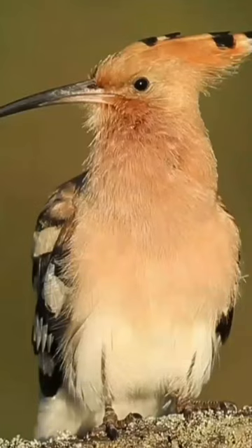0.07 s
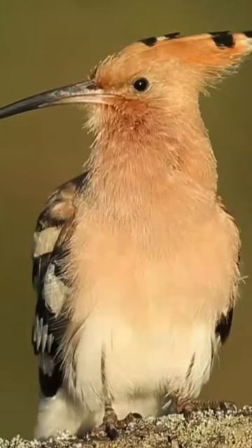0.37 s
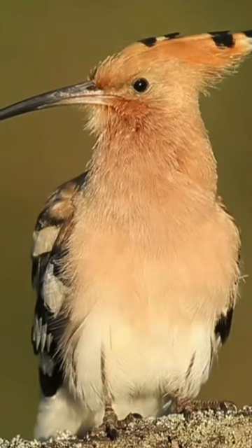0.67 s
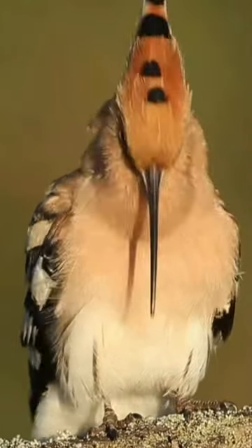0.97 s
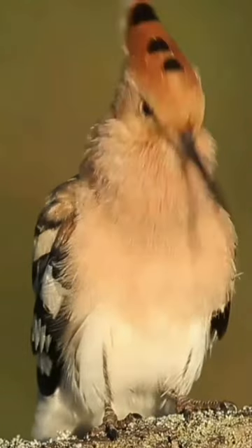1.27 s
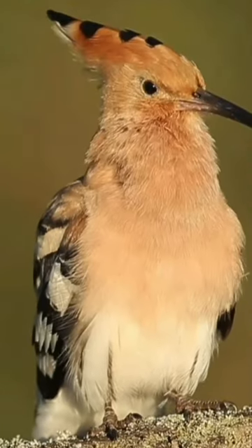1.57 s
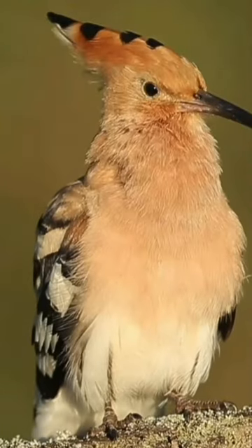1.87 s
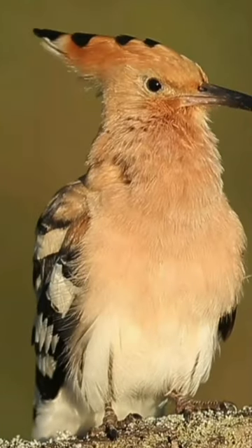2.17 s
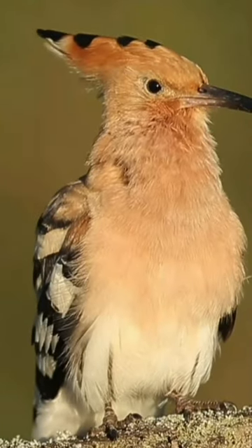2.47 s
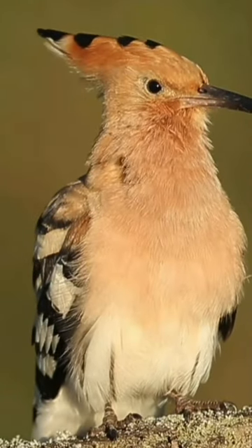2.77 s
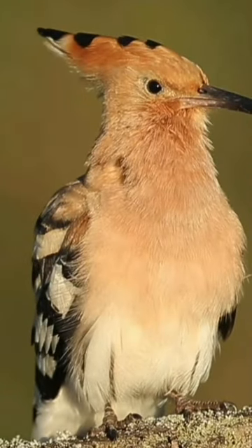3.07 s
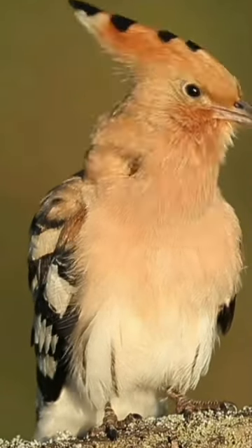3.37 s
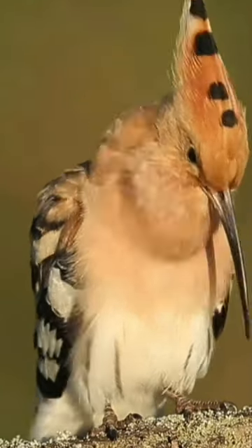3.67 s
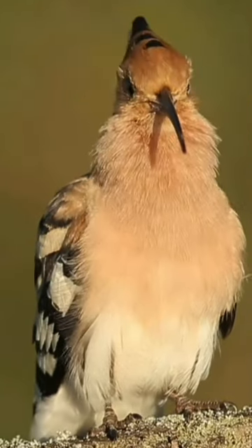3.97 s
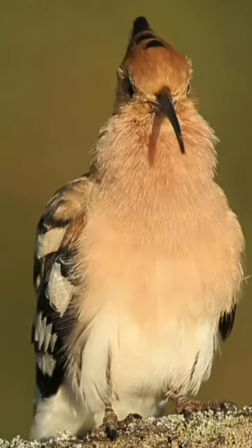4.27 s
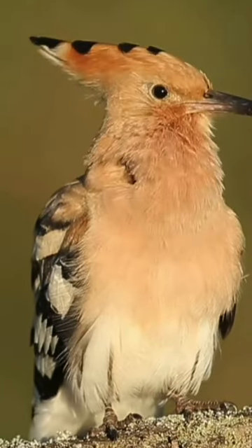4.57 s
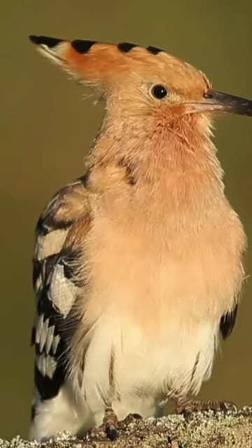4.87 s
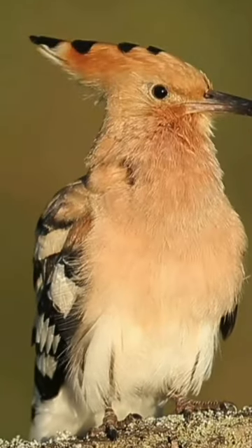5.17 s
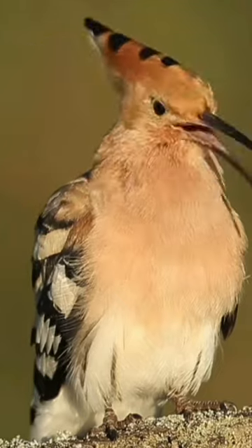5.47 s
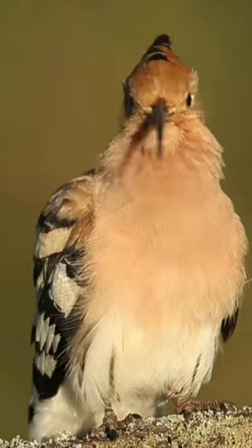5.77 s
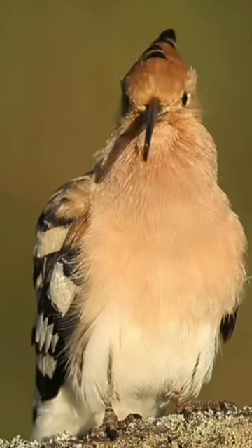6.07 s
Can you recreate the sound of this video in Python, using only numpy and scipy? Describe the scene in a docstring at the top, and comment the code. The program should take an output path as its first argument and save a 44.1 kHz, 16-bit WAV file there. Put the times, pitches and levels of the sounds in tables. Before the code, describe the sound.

Soft double hoots from a nearby bird sound twice, with distant twittering, falling whistles and an even hiss behind them.

```python
"""A hoopoe on a branch gives two pairs of soft, almost pure hoots from its swollen throat, and the
trees around send them back faintly. Farther off, one bird repeats a thin descent and a long falling
whistle; others twitter, chirp, tick, warble and trill, all gliding tones blurred by trunks and leaves.
A few soft plops and one dry, ringing knock fall between the calls. One microphone takes it all in,
over a steady outdoor hiss with two thin whines and, later, two faint far drones."""
import sys
import numpy as np
from scipy import signal
from scipy.fft import rfft, irfft
from scipy.io import wavfile
from scipy.ndimage import uniform_filter1d

SR = 44100
rng = np.random.default_rng(int(sys.argv[2]) if len(sys.argv) > 2 else 0)


def wav_out(sig):
    """Save sig, one row per channel (or a flat mono array), as 16-bit PCM at SR to the path in sys.argv[1]."""
    wavfile.write(sys.argv[1], SR, np.round(np.clip(np.atleast_2d(sig).T, -1, 1) * 32767).astype(np.int16))


N = 273861
TIME = np.arange(N) / SR

# Colour of the air and microphone hiss. Each row: frequency in Hz, relative density in dB.
HISS_SPECTRUM = [(25, -30), (55, -2.5), (95, 1.5), (160, -2), (300, -2), (600, 1), (1200, -2.5), (2000, -7),
                 (4000, -6.5), (7000, -10.5), (8000, -10.5), (10000, -13.5), (13000, -15), (15500, -17.5)]
# Thin, steady whines. Each row: pitch in Hz, level in dB.
WHINES = [(7838, -79.5), (14040, -88)]
# Faint drones, far off. Each row: start and end in seconds, pitch in Hz, level in dB.
DRONES = [(3.899, 5.39, 420.6, -71.5), (4.15, 6.593, 584.7, -72)]
# Twittering deep in the trees. Each row: start and end in seconds, relative level in dB,
# centre pitch in Hz.
TWITTER_BOUTS = [(0.201, .27, -66, 3700), (0.568, .72, -68, 2910), (1.117, 1.62, -68.5, 4980),
                 (1.647, 2.45, -68.5, 3480), (2.502, 2.7, -66.5, 4400), (2.601, 3.4, -67.5, 2955),
                 (3.919, 4.12, -60, 3890), (4.004, 4.139, -66, 6460), (4.152, 4.85, -63.5, 3890),
                 (4.868, 4.97, -64, 5740), (5.041, 5.24, -61, 2800), (5.384, 5.6, -60, 4590)]
# The whistler's songs. Each row: start and length of the whistle in seconds, its level in dB,
# level of the descent before it in dB.
WHISTLE_SONGS = [(0.852, .17, -54.5, -63), (3.284, 0.16, -53.5, -58), (5.7, 0.16, -52.5, -57)]
# Course of the descent and of the whistle. Each row: share of the length, loudness 0-1, pitch in Hz.
DESCENT_SHAPE = [(0, .25, 7850), (.5, .25, 7650), (.6, .05, 7150), (.71, .55, 6500), (.82, .1, 5900),
                 (.89, 1, 5450), (1, .2, 5350)]
WHISTLE_SHAPE = [(0, 0, 4450), (.07, .75, 4300), (.2, 1, 4160), (.35, .8, 3900), (.52, .6, 3530),
                 (.67, .5, 3220), (.79, .55, 3060), (.89, .3, 2935), (1, .18, 2820)]
# Arched chirps. Each row: start and length in seconds, level in dB, top pitch in Hz,
# place of the top (0 for a falling note, 1 for a rising one).
CHIRPS = [(.535, .028, -62, 4800, 0.36), (1.718, 0.021, -63, 3850, 0.77), (1.9, 0.064, -65.5, 3900, 0.85),
          (1.975, .056, -68, 3800, 0.058), (2.142, 0.035, -59.5, 3880, 0.29),
          (2.266, 0.0333, -69, 3290, .25), (2.302, 0.057, -62, 4160, 0.79),
          (2.476, 0.05, -58.5, 3850, 0.31), (2.703, .054, -61.5, 3710, .15),
          (3.881, 0.043, -56.5, 3520, 0.69), (3.942, 0.026, -59.5, 4100, 0.27),
          (4.011, 0.019, -56, 3690, .6), (4.061, .013, -59, 7100, 0.91), (4.816, 0.024, -59, 3850, 0.76),
          (5.056, 0.024, -56, 3950, 0.067), (5.084, .026, -53.5, 3600, 0.99),
          (5.112, 0.023, -52.5, 3300, .85), (5.219, .046, -56, 4050, .7), (5.474, 0.037, -57, 4230, 0.41),
          (5.621, .018, -50.5, 3300, 0.48), (6.194, 0.025, -47.5, 3420, 0.34)]
# The hoopoe's hoots. Each row: start and length in seconds, level in dB, top pitch in Hz,
# lateness of the swell (above 1 it peaks later).
HOOTS = [(1.007, 0.11, -29.5, 630.7, 1.3), (1.212, 0.096, -29.5, 627.3, 1.02),
         (3.491, .102, -29, 629.4, 1.4), (3.692, 0.094, -28.5, 628.4, 1.02)]
# Course of a hoot. Each row: share of the length, loudness 0-1, pitch as a factor on the top pitch.
HOOT_SHAPE = [(0, .03, .89), (.1, .24, .968), (.3, .62, .988), (.46, .93, .998), (.6, 1, 1),
              (.76, .8, .994), (.9, .55, .98), (1, 0, .92)]
# Faint buzz in a hoot. Each row: frequency in Hz, level in dB against the fundamental.
HOOT_OVERTONES = [(1880, -46), (2500, -41), (3150, -39), (4400, -37.5), (5600, -37), (6900, -39.5),
                  (8700, -43.5), (9500, -50), (10500, -83)]
# Hoots coming back from the trees. Each row: delay in seconds, level in dB against the direct sound.
HOOT_ECHOES = [(.044, -22), (.137, -28)]
# A bird's runs of ticks. Each row: start, end and spacing in seconds, level in dB, pitch in Hz.
TICK_RUNS = [(1.145, 1.6, .183, -60.5, 4670), (4.607, 5.35, .113, -58, 4536)]
# Soft plops. Each row: time of the peak in seconds, level in dB, pitch in Hz, rise and decay in seconds.
PLOPS = [(2.484, -53, 644, 0.012, 0.0034), (2.545, -55.5, 421, 0.0099, 0.015),
         (2.581, -51, 640, .006, .004), (2.648, -45, 676, 0.0028, 0.0022), (2.649, -52, 397, 0.006, 0.0043)]
# High warbles that end in a flick. Each row: start of the flick and length of the warble before it
# in seconds, level of the warble and of the flick in dB.
WARBLES = [(3.286, .045, -58, -57.5), (3.461, .07, -56, -56), (3.621, .062, -56, -62),
           (3.799, .075, -58.5, -63)]
# The downward slurs of a trill. Each row: start and length in seconds, level in dB.
TRILL_SLURS = [(4.160, 0.064, -49.5), (4.284, 0.048, -48.5), (4.402, 0.06, -49), (4.519, 0.05, -47.5),
               (4.632, .052, -48.5), (4.737, 0.058, -49)]
# Course of a slur. Each row: share of the length, loudness 0-1, pitch in Hz.
SLUR_SHAPE = [(0, .28, 4850), (.13, .08, 4500), (.23, .9, 3920), (.46, .42, 3520), (.65, 1, 3120),
              (.76, .4, 2780), (.85, .5, 2540), (.93, .12, 2330), (1, .15, 2140)]
# Course of one piping note. Each row: time in seconds, pitch in Hz, level in dB.
PIPING_COURSE = [(4.268, 3080, -68), (4.287, 3116, -52.5), (4.32, 3125, -48.5), (4.345, 3140, -49),
                 (4.368, 3010, -56), (4.395, 2785, -57), (4.42, 2630, -59)]
# Sharp chips. Each row: start and length in seconds, level in dB.
CHIPS = [(4.882, 0.021, -49.5), (5.292, 0.023, -47), (6.101, 0.053, -45.5)]
# Course of a chip. Each row: share of the length, loudness 0-1, pitch in Hz.
CHIP_SHAPE = [(0, .05, 3100), (.1, .22, 4100), (.25, .15, 3900), (.36, 1, 3380), (.52, .9, 3050),
              (.75, .45, 2850), (1, .1, 2850)]
# Raspy bird buzzes. Each row: start and length in seconds, level in dB, centre pitch and swing in Hz,
# swings a second.
BUZZES = [(5.033, 0.034, -52, 4080, 350, 171), (5.128, 0.097, -57, 2864, 415, 62)]
# Contacts of the knock, a light touch first. Each row: start in seconds, relative level in dB.
KNOCK_CONTACTS = [(5.508, -55), (5.541, -45), (5.546, -43)]
# Ring of the knock. Each row: frequency in Hz, relative level in dB, seconds to fall by 60 dB.
KNOCK_MODES = [(890, -6, 0.022), (1080, 2, 0.023), (1390, 6, 0.02), (1888, -0.5, 0.05), (2500, -3, 0.019),
               (2860, -3, .02)]


def amp(db):
    """Decibels to gain."""
    return 10 ** (np.asarray(db) / 20)


def unit(x):
    """Scales to an rms of 1."""
    return x / np.sqrt(np.mean(x ** 2) + 1e-20)


def level_at(spectrum, hz):
    """Reads a spectrum on a log-frequency axis."""
    freqs, db = np.transpose(spectrum)
    return np.interp(np.log(hz + 1), np.log(freqs), db)


def add(mix, start, sound):
    """Mixes a sound in at a start time in seconds."""
    part = mix[max(round(start * SR), 0):][:len(sound)]
    part += sound[:len(part)]


def drift(size, hz):
    """Random wander of rms about 1, with changes up to the given rate."""
    freqs = np.fft.rfftfreq(N, 1 / SR)
    return unit(irfft(rfft(rng.standard_normal(N)) / (1 + (freqs / hz) ** 4), N))[:size]


def sine(hz):
    """A tone of rms 1 that follows a pitch curve."""
    return np.sqrt(2) * np.sin(2 * np.pi * np.cumsum(hz) / SR)


def course(shape, length, late=1):
    """Loudness and pitch along one note, with rounded corners; late > 1 delays its peak."""
    share, *columns = np.transpose(shape)
    u = np.linspace(0, 1, int(length * SR)) ** late
    return [uniform_filter1d(np.interp(u, share, c), len(u) // 16, mode="nearest") for c in columns]


def glide(length, pitches):
    """Loudness and pitch of a short note that bends through a start, middle and end pitch."""
    u = np.linspace(0, 1, int(length * SR))
    return np.sin(np.pi * u), np.polyval(np.polyfit([0, .5, 1], pitches, 2), u)


def low_pass(x, hz):
    """Steep low-pass."""
    return signal.oaconvolve(x, signal.firwin(511, hz, window=("kaiser", 9), fs=SR)[None], "same")


def woods(x, t60, build_s):
    """Scatter from trunks and leaves: sparse reflections that build up, then die away."""
    t = TIME[:SR]
    taps = rng.standard_normal(SR) * (rng.random(SR) < .1)
    tail = taps * (1 - np.exp(-(t / build_s) ** 2)) * np.exp(-np.log(1000) * t / t60)
    return signal.fftconvolve(x, tail / np.linalg.norm(tail))[:N]


def background(hiss_db=-59, swell_db=.92, whine_waver_hz=11, drone_waver_hz=2.46, drone_waver_db=2):
    """The bed of the place: even hiss of air and microphone, thin whines and far, wavering drones."""
    colour = amp(level_at(HISS_SPECTRUM, np.fft.rfftfreq(N, 1 / SR)))
    swell = amp(hiss_db + swell_db * drift(N, 3.9))
    out = swell * unit(irfft(rfft(rng.standard_normal(N)) * colour, N))
    for hz, db in WHINES:
        out += amp(db) * sine(hz + whine_waver_hz * drift(N, 30))
    for start, end, hz, db in DRONES:
        n = int((end - start) * SR)
        loud = amp(db + drone_waver_db * drift(n, 1.4)) * signal.windows.tukey(n, .6)
        add(out, start, loud * sine(hz + drone_waver_hz * drift(n, 3.55)))
    return out


def twitter(per_s=55, note_s=.0159, spread=.0806, uneven_db=2.5, direct_db=-7, scatter_db=-1):
    """Quick random notes from deep in the trees, reaching the microphone mostly as scatter."""
    notes = np.zeros(N)
    for start, end, db, centre_hz in TWITTER_BOUTS:
        for slot in np.arange(start, end, 1 / per_s):
            loud, hz = glide(note_s, centre_hz * (1 + spread * rng.standard_normal(3)))
            onset = slot + rng.random() / per_s
            add(notes, onset, amp(db + uneven_db * rng.standard_normal()) * loud * sine(hz))
    return amp(direct_db) * notes + amp(scatter_db) * woods(notes, t60=.13, build_s=.014)


def whistles(lead_s=.328, descent_s=.193):
    """One bird, some way off: a thin, high descent, then a long falling whistle."""
    for start, length, db, descent_db in WHISTLE_SONGS:
        yield start - lead_s, descent_db, *course(DESCENT_SHAPE, descent_s)
        yield start, db, *course(WHISTLE_SHAPE, length)


def chirps(bend=.32, curve=1.4):
    """Short arches whose pitch falls away on both sides of the top."""
    for start, length, db, top_hz, top_place in CHIRPS:
        u = np.linspace(0, 1, int(length * SR))
        hz = top_hz * (1 - bend * abs(u - top_place) ** curve)
        yield start, db, np.sqrt(abs(np.sin(np.pi * u))), hz


def hoopoe(octave_db=-36, uneven_db=1.5, rasp=.28, scatter_db=-27):
    """The swollen throat rings almost as a sine; pitch arches with pressure, full voice buzzes a bit."""
    voice, orders = np.zeros(N), np.arange(3, 17)
    for start, length, db, top_hz, late in HOOTS:
        loud, bend = course(HOOT_SHAPE, length, late)
        hz = top_hz * bend
        overtone_db = level_at(HOOT_OVERTONES, orders * top_hz)
        gains = amp(overtone_db + uneven_db * rng.standard_normal(len(orders)))
        buzz = sum(gain * sine(k * hz) for k, gain in zip(orders, gains))
        buzz *= 1 + rasp * drift(len(hz), 110)
        octave = amp(octave_db) * loud ** .22 * sine(2 * hz)
        add(voice, start, amp(db) * (loud * (sine(hz) + buzz) + octave))
    out = voice + amp(scatter_db) * woods(voice, t60=.99, build_s=.012)
    for delay, db in HOOT_ECHOES:
        add(out, delay, amp(db) * voice)
    return out


def ticks(tick_s=.0192, rise=.036, spread=.021):
    """Tiny rising notes at a steady pace, each a little off the last in pitch."""
    for start, end, spacing, db, hz in TICK_RUNS:
        for onset in np.arange(start, end, spacing):
            bend = 1 + rise * np.array([-1, 0, 1]) + spread * rng.standard_normal(3)
            yield onset, db, *glide(tick_s, hz * bend)


def plops(sag_per_s=2.6, lead_s=.05):
    """A few low cycles that swell, sink in pitch and stop."""
    out = np.zeros(N)
    t = TIME[:int(2 * lead_s * SR)] - lead_s
    for peak, db, hz, rise, decay in PLOPS:
        swell = np.exp(-abs(t / np.where(t < 0, rise, decay)) ** .91)
        add(out, peak - lead_s, amp(db) * swell * sine(hz * np.exp(-sag_per_s * t)))
    return out


def warbles(stroke_s=.0185, low_hz=4230, high_hz=6000, fade=.36, uneven=.101, rough=.023,
            flick_s=.029, flick_hz=(4410, 6030, 6150)):
    """Quick, high upstrokes that lead into a longer flick."""
    for flick_start, length, db, flick_db in WARBLES:
        n = int(length * SR)
        stroke = ((TIME[:n] - length) / stroke_s + uneven * drift(n, 50)) % 1  # 0 to 1 in each upstroke
        loud = signal.windows.tukey(n, .3) * np.sqrt(np.sin(np.pi * stroke)) * (1 - fade * stroke)
        hz = (low_hz + (high_hz - low_hz) * stroke ** 1.1) * (1 + rough * drift(n, 900))
        yield flick_start - length, db, loud, hz
        yield flick_start, flick_db, *glide(flick_s, flick_hz)


def trill(swoop_s=.032, swoop_db=-55, swoop_hz=(5800, 5050, 4300), lead_s=.017):
    """A swoop from high up leads into a run of downward slurs."""
    yield TRILL_SLURS[0][0] - lead_s, swoop_db, *glide(swoop_s, swoop_hz)
    for start, length, db in TRILL_SLURS:
        yield start, db, *course(SLUR_SHAPE, length)


def piping():
    """One clear, level note that sags as it fades."""
    times, hz, db = np.transpose(PIPING_COURSE)
    t = np.arange(times[0], times[-1], 1 / SR)
    yield times[0], db.max(), amp(np.interp(t, times, db - db.max())), np.interp(t, times, hz)


def chips():
    """Sharp notes that hook up and slide down."""
    for start, length, db in CHIPS:
        yield start, db, *course(CHIP_SHAPE, length)


def buzzes():
    """A bird's pitch swings fast enough to rasp; each swing is loudest low down, on its way up."""
    for start, length, db, hz, swing_hz, rate in BUZZES:
        turn = 2 * np.pi * rate * TIME[:int(length * SR)]
        loud = signal.windows.tukey(len(turn), .3) * (.53 + .35 * np.cos(turn - 1))
        yield start, db, loud, hz - swing_hz * np.cos(turn)


def songbirds(clear_notes, short_notes, clear_blur=.65, waver=.0141, flutter_db=2, octave_db=-28,
              direct_db=-.76, leaves_db=-11, trees_db=-10, near_db=-50, distance_slope=.46):
    """Sings notes of (start, dB, loudness, pitch); the fainter, the farther off and the more blurred."""
    direct, scattered = np.zeros((2, N))
    wobble, flutter = drift(N, 280), drift(N, 120)
    for notes, blur in ((clear_notes, clear_blur), (short_notes, 1)):
        for start, db, loud, hz in notes:
            t = start + np.arange(len(hz)) / SR
            hz = hz * (1 + blur * waver * np.interp(t, TIME, wobble))
            gain = amp(db + flutter_db * np.interp(t, TIME, flutter))
            note = loud * gain * (sine(hz) + amp(octave_db) * sine(2 * hz))
            add(direct, start, note)
            add(scattered, start, np.sqrt(blur) * amp(distance_slope * (near_db - db)) * note)
    leaves = amp(leaves_db) * woods(scattered, t60=.07, build_s=.0021)
    trees = amp(trees_db) * woods(scattered, t60=.45, build_s=.018)
    return amp(direct_db) * direct + leaves + trees


def knock(scuff_db=-9, scuff_s=.0026, rise_s=.0011):
    """Each contact rings short damped modes, with a scuff of noise."""
    out, t = np.zeros(N), TIME[:SR // 10]
    for start, db in KNOCK_CONTACTS:
        ring = sum(amp(level) * np.exp(-np.log(1000) * t / t60)
                   * np.sin(2 * np.pi * (hz * t + rng.random())) for hz, level, t60 in KNOCK_MODES)
        scuff = amp(scuff_db) * np.exp(-t / scuff_s) * rng.standard_normal(len(t))
        add(out, start, amp(db) * (1 - np.exp(-t / rise_s)) * (ring + scuff))
    return out


def scene():
    """One microphone among the trees, the hoopoe in front and the small birds farther off."""
    mix = background() + twitter() + hoopoe() + plops()
    clear_notes = [*whistles(), *piping()]
    short_notes = [*chirps(), *ticks(), *warbles(), *trill(), *chips(), *buzzes()]
    return (mix + songbirds(clear_notes, short_notes) + knock())[None]


def record(dry, start_s=.066, treble_start_s=.36, fade_s=.005, dull_hz=9900, edge_hz=15500):
    """The sound sets in after a short silence, dull for a moment; then treble opens to the band limit."""
    dull = low_pass(dry, dull_hz)
    begun, opened = (np.clip((TIME - s) / fade_s, 0, 1) for s in (start_s, treble_start_s))
    return low_pass(begun * (dull + opened * (dry - dull)), edge_hz)


dry = scene()
out = record(dry)
wav_out(out)
```